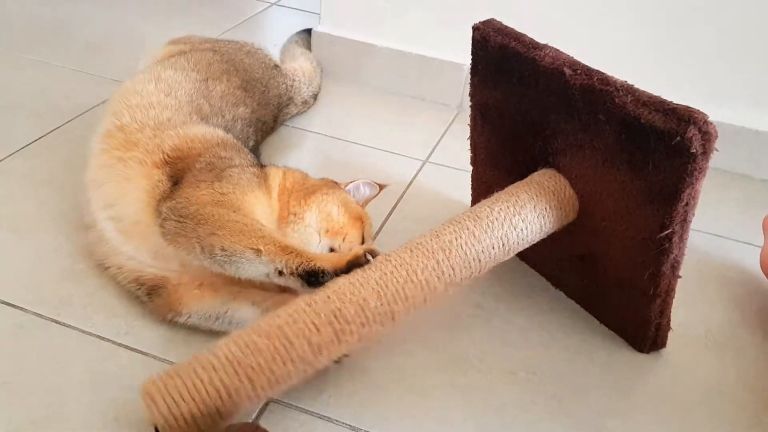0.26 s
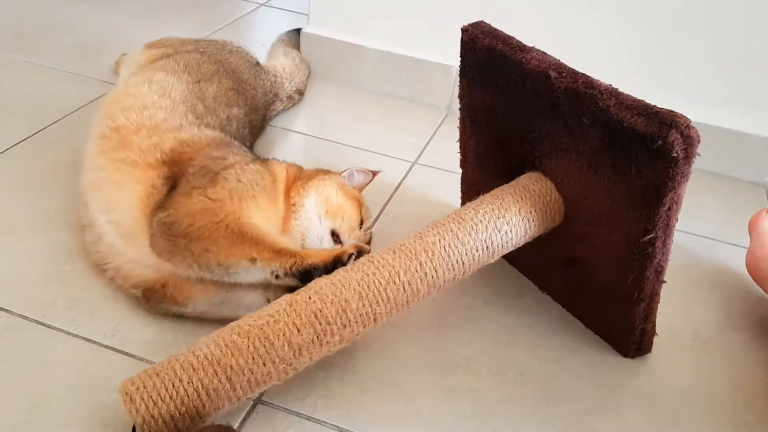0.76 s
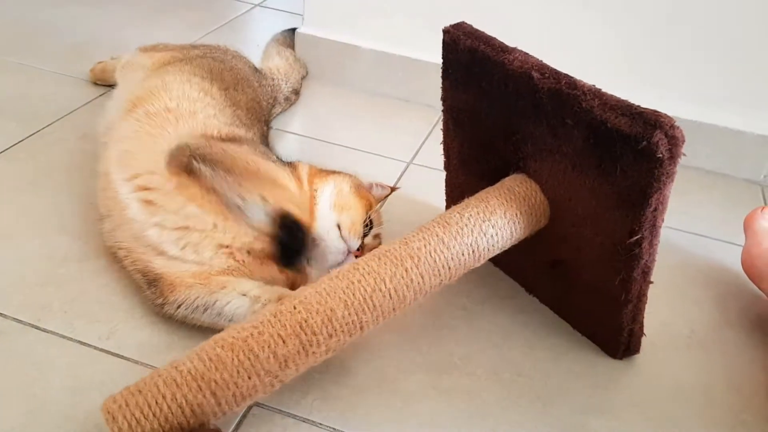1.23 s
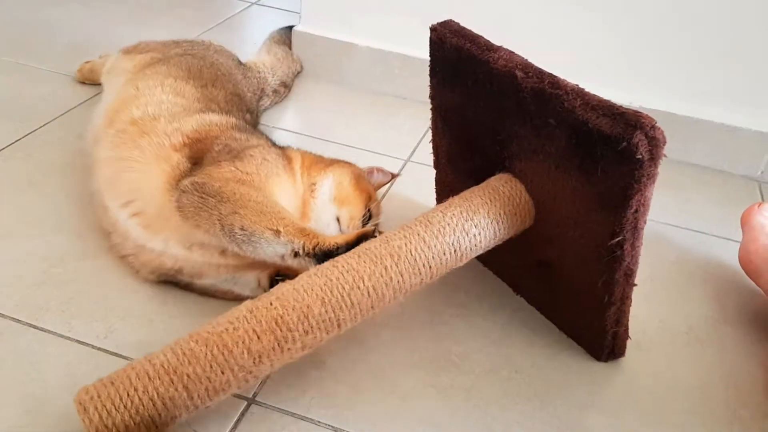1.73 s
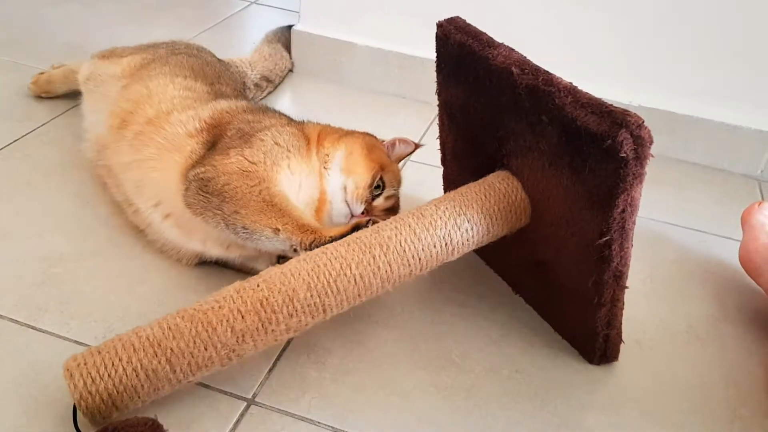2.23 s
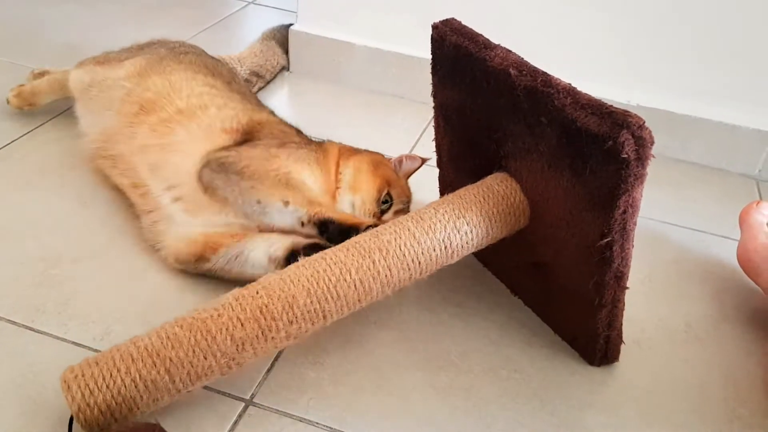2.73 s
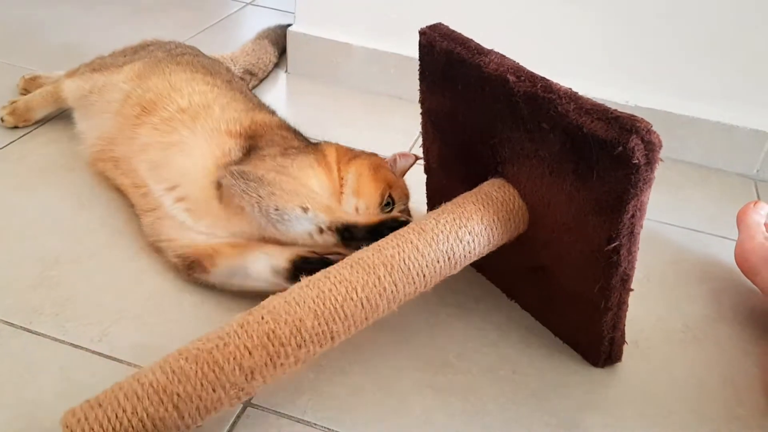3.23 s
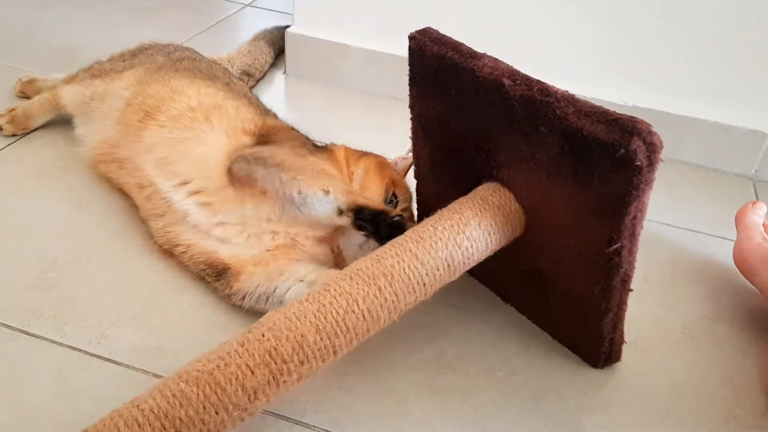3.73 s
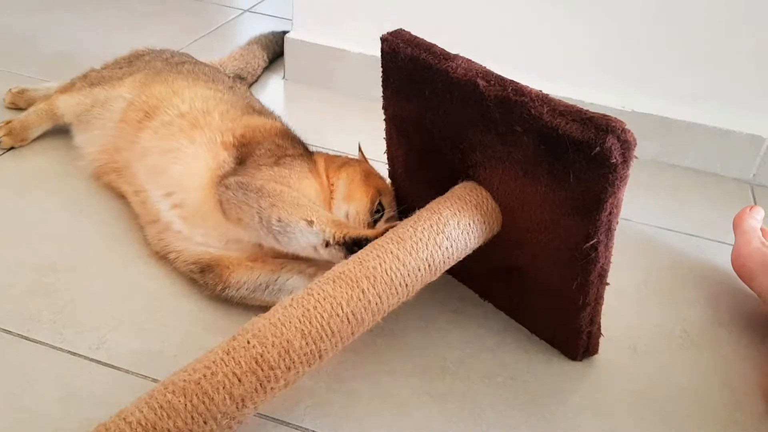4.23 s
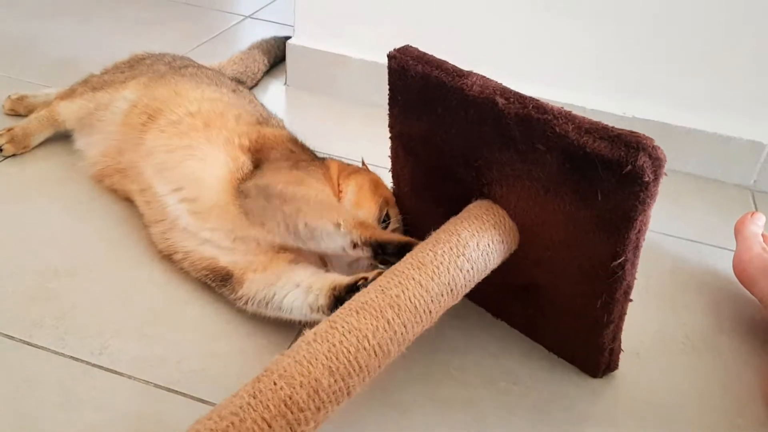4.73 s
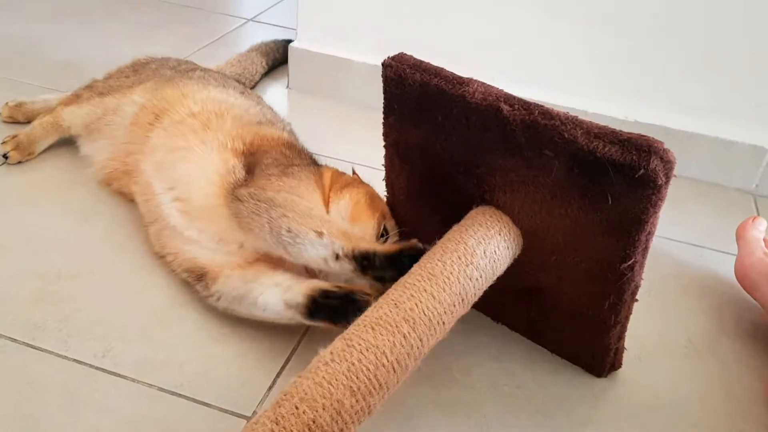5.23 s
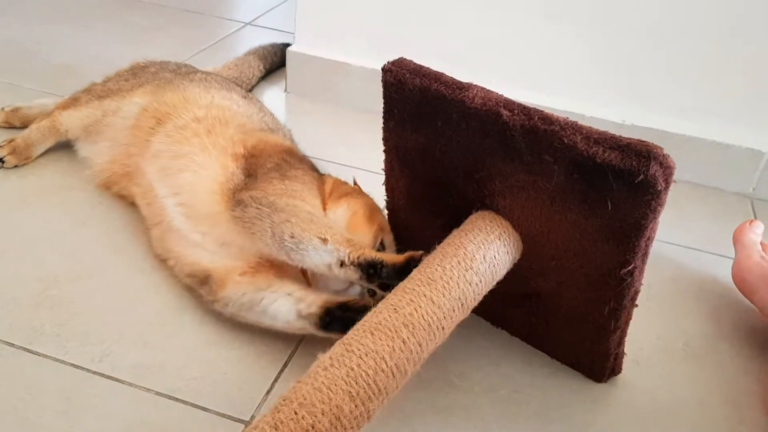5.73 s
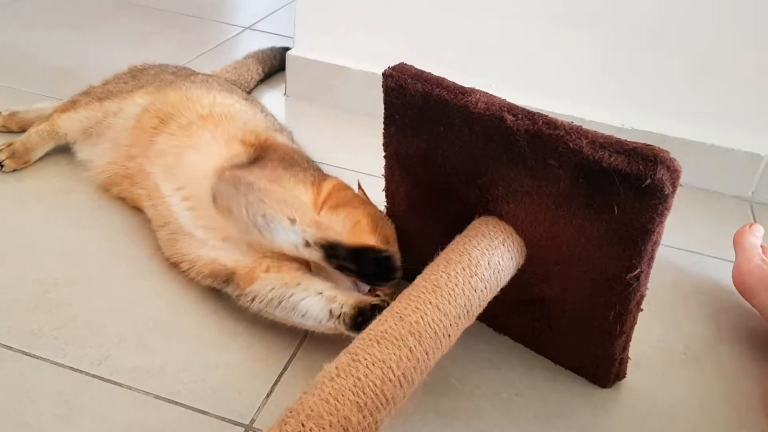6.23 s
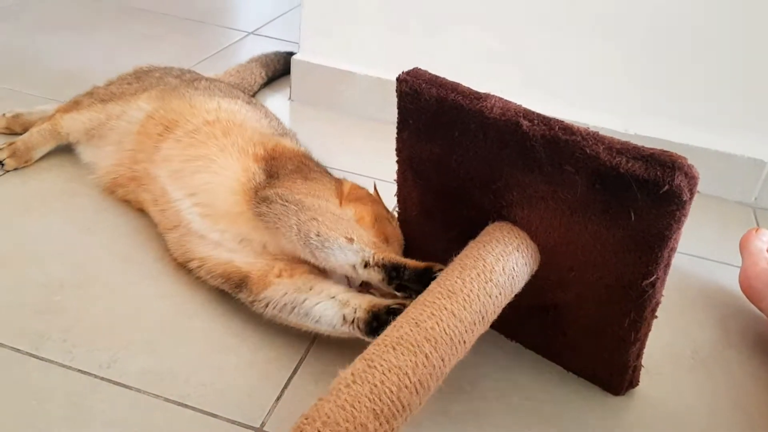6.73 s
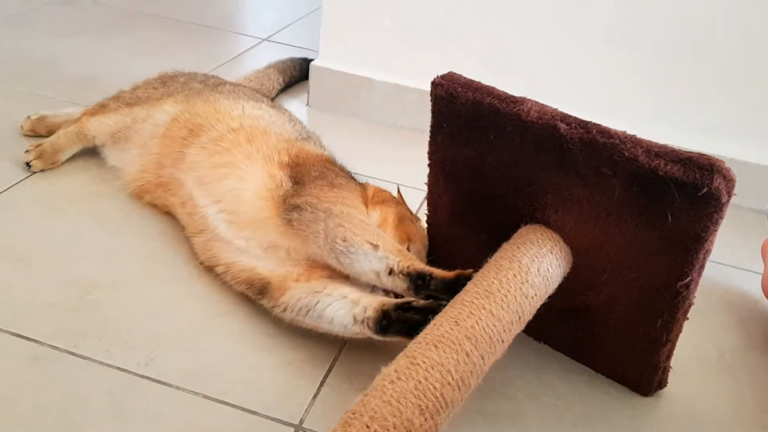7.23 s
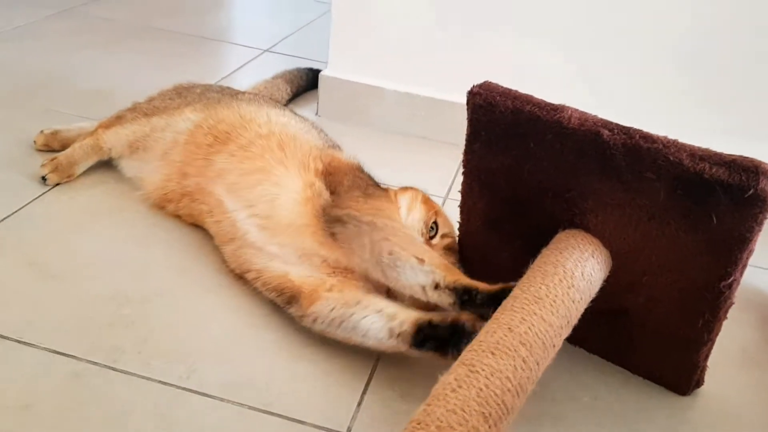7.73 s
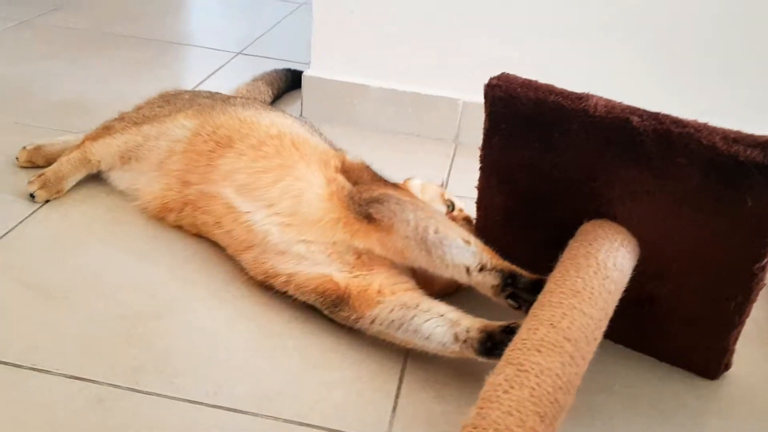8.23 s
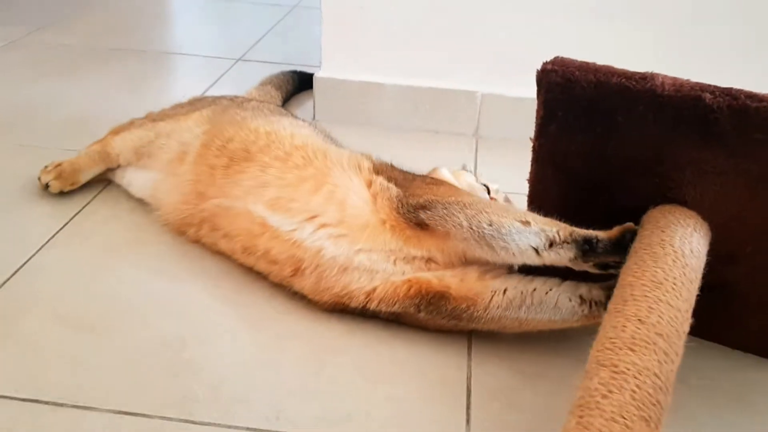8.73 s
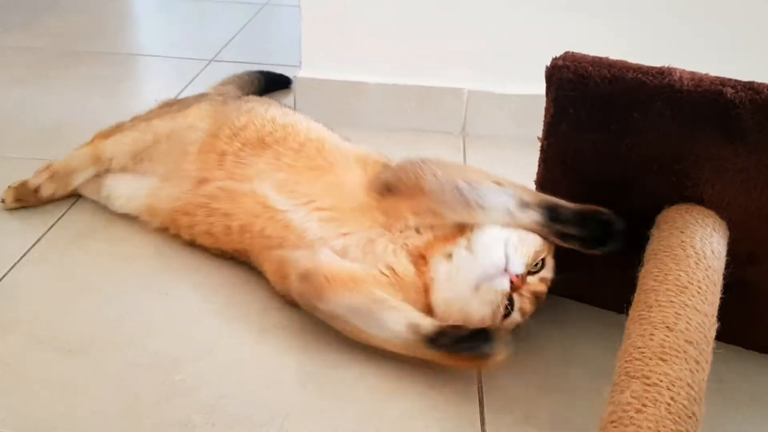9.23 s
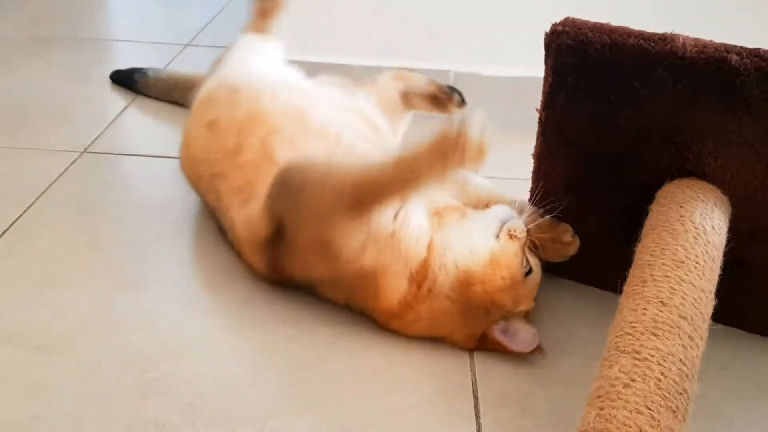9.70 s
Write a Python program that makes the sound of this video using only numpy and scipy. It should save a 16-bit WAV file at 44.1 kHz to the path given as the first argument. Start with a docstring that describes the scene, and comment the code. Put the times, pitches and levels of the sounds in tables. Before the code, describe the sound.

A quiet tiled room holds a steady low drone and thin, flickering hiss throughout. At about 0.4 s a paw faintly brushes coarse rope; at 0.65 a claw snaps free with a sharp, crackling pluck, hollow tube ring and short bright echo. Another strong snap comes at 1.05, a lesser one at 1.3, then light brushing until 2.5. A tight, loud burst hits around 3.0, followed by scattered snaps from 3.6 to 4.3, a hard one at 4.7 and smaller ones to 5.9. Two forceful snaps strike almost together at 6.1. Afterwards the action thins: modest ticks near 7.4, 7.7 and 8.2, faint ones to 9.25, with soft rope rustles. Subtle low tones swell near 4.5 and 6.8. From 7.7 to 9.4 dull, dry bumps nudge one side or the other, and fur slides softly on tile, last around 9.7.

```python
"""Throughout, a bare tiled room lies under a low drone and a flickering hiss, both shaped noise.
First a cat's paws brush a toppled rope scratching post (crackling noise), and claw tips catch lightly.
Then claws snap free: impulses ring strand, cardboard tube and base board, fibres tear and fizz, and the room
echoes; the more a claw pulls, the louder the post rings and the paw brushes near each snap.
Later, sine tones swell from the drone, fur slides over the tiles, and dull one-cycle pushes bump close by."""
import sys
import numpy as np
from scipy import signal
from scipy.fft import rfft, irfft, next_fast_len
from scipy.io import wavfile
from scipy.ndimage import map_coordinates

SR = 44100
rng = np.random.default_rng(int(sys.argv[2]) if len(sys.argv) > 2 else 0)


def transcribe(u):
    """Save the signal u as a 16-bit wav file named by the first command-line argument.

    u: samples, shape (n,) or (channels, n), limited to [-1, 1]; the rate is SR.
    q: integer samples, one column per channel.
    """
    v = np.clip(np.atleast_2d(u).T, -1, 1)
    q = np.round(v * 32767).astype(np.int16)
    wavfile.write(sys.argv[1], SR, q)


N = 439236

# relative spectrum of the low drone: [f/Hz, level/dB]
DRONE_SPECTRUM = [(20, -31), (40, -10), (55, -14), (73, -1), (85, -2.5), (99, 2.5), (122, -6.5),
                  (145, -8.5), (200, -13), (290, -18), (400, -29), (600, -43)]
# relative spectrum of the room's hiss: [f/Hz, level/dB]
HISS_SPECTRUM = [(100, -13), (350, 11), (600, 4), (1100, 7), (2000, 4.5), (3000, -2), (4000, 4),
                 (5600, -3.5), (7400, -11), (10800, -2.5), (13000, -4.5), (16000, -13.5)]
# left-right correlation of diffuse sound: [f/Hz, correlation]
CORRELATION = [(30, 0.64), (80, 0.93), (160, 0.81), (330, 0.59), (800, 0.35), (1500, 0.028), (10000, 0.014)]
# a paw brushes along the rope on its own: [middle t/s, half length/s, level/dB]
BRUSHES = [(0.416, .1, -57), (1.45, .11, -54.5), (1.714, 0.022, -65), (1.9, 0.19, -60.5),
           (2.311, 0.017, -60), (3.384, .12, -63.5), (3.58, 0.068, -58.5), (4.462, .05, -56.5),
           (5.395, 0.14, -66), (6.715, 0.097, -62.5), (7.082, 0.067, -57), (7.19, 0.032, -57),
           (8.128, .04, -58.5), (8.277, 0.064, -66), (8.411, 0.035, -52.5), (8.901, 0.058, -60),
           (9.591, 0.062, -62), (9.936, 0.041, -57.5)]
# relative spectrum of the crackling rope fibres: [f/Hz, level/dB]
FIBRE_SPECTRUM = [(300, -11), (1200, -13.5), (2300, 0.5), (3400, -2.5), (4000, 2.5), (4800, -3.5),
                  (6200, -3), (7600, -11.5), (10900, -7), (13500, -15), (16000, -20)]
# modes of the base board, the cardboard tube and the whole post as it flexes: [f/Hz, width/Hz, level/dB]
BOARD_MODES = [(247.5, 4.6, -20), (289, 19, 3.5), (320, 11.7, -8), (346.8, 8.8, 4), (412, 31, -60)]
TUBE_MODES = [(1020, 140, -5), (1463, 17, -10.5), (1624, 34, -5.5), (1813, 140, 9.5), (1877, 117, 3.5),
              (2132, 60, -8), (2660, 330, -12.5)]
BENDING_MODES = [(750, 450, -31), (789, 31, 9.5), (840, 100, -2)]
# modes of the rope and of its fizzing fibres: [f/Hz, width/Hz, level/dB]
ROPE_MODES = [(3268, 180, -9.5), (3990, 600, -10.5), (4900, 560, -1), (6070, 200, -7)]
FIZZ_MODES = [(9080, 4600, 2), (10780, 1300, -4), (13860, 6300, -1)]
# reverberation time of the tiled room: [f/Hz, T60/s]
ROOM_T60 = [(250, 0.49), (800, 0.57), (2000, 0.3259), (4500, .5), (10000, 0.51), (16000, 1)]
# relative gain of the room's tail: [f/Hz, level/dB]
ROOM_COLOUR = [(200, 8), (400, -1.5), (600, 4), (1100, 6.5), (1800, 4), (2600, 4.5), (3400, 0), (4300, 2),
               (6300, -4.5), (8000, -2), (11000, 0), (15000, -6)]
# a claw snaps free: [t/s, strength level/dB, pull level/dB re strength, fraying level/dB re strength, strand f/Hz]
SNAPS = [(0.6518, -35, -2, -10, 4300), (1.0536, -33.5, -5, -12, 5500), (1.0835, -46.5, 6, -12, 3470),
         (1.2709, -42, -1, -3.5, 4100), (1.3889, -60.5, 6.5, 4, 4000), (2.511, -48, 6.5, -7, 3980),
         (2.9504, -42.5, -11, -3, 4830), (3.0198, -29.5, -9.5, -10.5, 4670), (3.037, -43, -7, -2, 4200),
         (3.0496, -38.5, 0, -1, 3500), (3.561, -48, -30, -8, 4970), (3.6662, -36.5, -17, -9, 4430),
         (3.8642, -39.5, -16.5, -8.5, 4600), (4.0059, -42.5, -5.5, -16, 2850),
         (4.0128, -42, 2.5, -18.5, 3490), (4.3062, -47, 5, 3, 4800), (4.7033, -31.5, -14.5, -15, 4900),
         (4.805, -44, -11, -5, 4300), (4.8158, -38, -22.5, -12, 3480), (5.0289, -43.5, 2, -0.5, 3430),
         (5.1579, -59.5, 8, 8.5, 3970), (5.344, -53.5, -8, -14, 3600), (5.4904, -55.5, -14, -4, 3430),
         (5.5625, -54, -19, -14, 3740), (5.647, -42, -6, -1.5, 4550), (5.9432, -43.5, -20, -12.5, 3200),
         (6.0991, -30.5, -32, -8.5, 4660), (6.1379, -30, -15.5, -13, 3220), (6.3148, -50, 3, 4, 3860),
         (6.586, -59.5, -16, -25, 3250), (6.7949, -66.5, 10, 3, 3700), (6.9739, -47, -18.5, -39, 3190),
         (7.4043, -41.5, -12.5, -4, 3030), (7.5416, -50.5, -14.5, -2, 6500), (7.556, -48.5, -19, -6, 3700),
         (7.6676, -40, -26, -12, 3690), (7.7894, -55, -18.5, -10, 3760), (8.173, -41.5, -16.5, -14, 2870),
         (8.5926, -48.5, -15, -20, 2870), (9.093, -50, -15, -12, 3870), (9.251, -47, -19, -32, 2900)]
# low tones swell out of the drone: [middle t/s, half length/s, level/dB, f/Hz]
TONES = [(3.097, 0.13, -51.5, 77), (4.499, 1, -54.5, 112), (5.622, 0.049, -48.5, 102.4),
         (6.749, 0.63, -51, 69.9), (6.848, 0.22, -55.5, 120.6)]
# fur slides over the tiles: [middle t/s, half length/s, level/dB, f/Hz]
SLIDES = [(2.877, 0.065, -53, 193), (8.046, 0.028, -60, 463), (8.675, 0.047, -61, 480),
          (8.889, .067, -61, 1360), (9.701, .1, -58.5, 414)]
# dull bumps close by: [t/s, level/dB, f/Hz, left-over-right level/dB]
BUMPS = [(7.6893, -29, 244, -23), (7.886, -39.5, 61, -29), (7.9971, -34, 260, 17), (8.0014, -31, 264, 7),
         (8.5938, -33, 714, -21), (8.8005, -40.5, 373, 23), (9.1854, -39.5, 167, -16),
         (9.3656, -37, 526, 31)]

TOP_HZ = 16200  # upper band limit
LEAD_S = 0.008  # the claw starts to slip this long before it lets go
MURMUR_DB = -12  # the tube under a brushing paw, re its crackle
# after a snap the paw brushes on: delay (s), half length (s)
FOLLOW_S, FOLLOW_HALF_S = 0.12, 0.087
# its level (dB) when strength and pull are 0 dB, and its growth with each (dB per dB)
FOLLOW_DB, FOLLOW_PER_STRENGTH, FOLLOW_PER_PULL = -31.5, 0.71, 0.8
# light catches: rate (per s), strength re the stroke (dB), scatter (dB), middle strand pitch (Hz)
CATCHES_PER_S, CATCH_DB, CATCH_SCATTER_DB, CATCH_HZ = 16, -7.5, 4.5, 3900
# the tube lies between strand and board: base level re strength (dB), share of the pull
TUBE_DB, TUBE_PULL = 3, 0.47
STRAND_DB = 3  # rope and plucked strand re strength
BENDING_DB = -14  # the flexing post re the tube's ring
# beyond an easy strength (dB), a snap rings the tube more and tears less, as it breaks clean (dB per dB)
EASY_DB, TUBE_PER_FORCE, TEAR_PER_FORCE = -43, 0.29, -0.6
# tearing fibres: base level re the fizz (dB), build-up time constant (s)
TEAR_DB, TEAR_BUILD_S = 7.5, 0.0035
# the room's answer (dB); it grows with the pull, as the whole post radiates (dB per dB)
ROOM_DB, ROOM_PER_PULL = -6.5, 0.095


def amp(db):
    """An amplitude ratio is ten to the power of level / 20."""
    return 10 ** (np.asarray(db) / 20)


def unit(x):
    """Normalisation: dividing by the root mean square gives rms 1."""
    return x / np.sqrt(np.mean(x ** 2) + 1e-20)


def along(points, hz):
    """Linear interpolation of (f/Hz, value) points over log frequency."""
    f, value = np.transpose(points)
    return np.interp(np.log(hz + 1), np.log(f + 1), value)


def add(track, s, sound):
    """Superposition: a stereo sound adds to the track from time s."""
    start = max(round(s * SR), 0)
    part = track[:, start:start + sound.shape[1]]
    part += sound[:, :part.shape[1]]


def pan(db):
    """Level difference between left and right at a mean power of 1."""
    return unit(amp([[db / 2], [-db / 2]]))


def filtered(x, response):
    """Linear filtering: the spectrum is multiplied by a response of frequency."""
    n = x.shape[-1]
    padded = next_fast_len(n + SR // 10)
    spectrum = rfft(x, padded) * response(np.fft.rfftfreq(padded, 1 / SR))
    return irfft(spectrum, padded)[..., :n]


def resonant(modes, hz):
    """Resonance: the gains of the modes add in power."""
    power = 0
    for centre, width, db in modes:
        detuning = 2 * (hz - centre) / width
        power = power + (amp(db) / width / np.sqrt(1 + detuning ** 2)) ** 2
    return np.sqrt(power)


def swell(half_s):
    """Gaussian envelope: times around a middle and the bell-shaped stroke over them."""
    reach = int(2.5 * half_s * SR)
    t = np.arange(-reach, reach) / SR
    return t, np.exp(-(t / half_s) ** 2)


def wobble(n, rate):
    """Random modulation: a smooth curve through `rate` random knots a second."""
    knots = rng.standard_normal(int(n * rate / SR) + 4)
    return map_coordinates(knots, [np.arange(n) * rate / SR])


def rush(gain, n):
    """Diffuse field: stereo noise of rms 1, alike in the bass and nearly unrelated in the treble."""
    def mid_side(hz):
        angle = np.arccos(np.clip(along(CORRELATION, hz), -1, 1)) / 2
        return gain(hz) * np.array([np.cos(angle), np.sin(angle)])
    mid, side = filtered(rng.standard_normal((2, n)), mid_side)
    return unit(np.array([mid + side, mid - side]))


def hum():
    """Stationary noise: a distant low drone under the room's flickering hiss."""
    drone = amp(-53.0) * rush(lambda hz: amp(along(DRONE_SPECTRUM, hz)), N)
    flicker = amp(-66.0 + 2.9 * wobble(N, rate=4.1))
    hiss = flicker * rush(lambda hz: amp(along(HISS_SPECTRUM, hz)), N)
    return (drone + hiss) * pan(-1.2)


def crackle(n, spread_db):
    """Granular noise: rope fibres give way in dense grains, of log-normal size."""
    grains = rng.standard_normal(n // 20 + 1)
    sizes = amp(spread_db * np.repeat(grains, 20)[:n])  # 20 samples a grain
    return unit(filtered(sizes * rng.standard_normal((2, n)), lambda hz: amp(along(FIBRE_SPECTRUM, hz))))


def hollow(hz):
    """Resonance of the post under a brushing paw: tube and flexing modes, above 600 Hz."""
    modes = resonant(TUBE_MODES, hz) + amp(-13) * resonant(BENDING_MODES, hz)
    return modes / (1 + (hz / 3500) ** 4) * (hz > 600)


def rubbing():
    """Friction: paws brush the rope, alone or after a snap, and the tube murmurs along."""
    out = np.zeros((2, N))
    follow = []
    for s, db, pull_db, _, _ in SNAPS:
        follow_db = FOLLOW_DB + FOLLOW_PER_STRENGTH * db + FOLLOW_PER_PULL * pull_db
        follow.append((s + FOLLOW_S, FOLLOW_HALF_S, follow_db))
    for s, half_s, db in BRUSHES + follow:
        t, stroke = swell(half_s)
        rub = crackle(len(t), spread_db=0.5) + amp(MURMUR_DB) * rush(hollow, len(t))
        pressure = amp(db + 1.9 * wobble(len(t), rate=70))  # the paw rides over the turns of the rope
        add(out, s + t[0], stroke * pressure * rub * pan(-8.5))
    return out


def tear(db):
    """Fracture: a crackle of fibres swells exponentially and stops at the release."""
    t = np.arange(-int(LEAD_S * SR), 0) / SR
    return amp(db) * np.exp(t / TEAR_BUILD_S) * crackle(len(t), spread_db=15.0) * pan(-9.0)


def ring(modes, band_hz, grip_s, slip_s, apart, span_s):
    """Stick-slip excitation of damped modes: noisy slips surround the release impulse at LEAD_S."""
    t = np.arange(SR // 4) / SR
    hz, width, db = np.transpose(modes)[:, :, None]
    strength = amp(db + 2 * rng.standard_normal(hz.shape))
    phase = apart * rng.standard_normal((2, len(modes), 1))  # each mode reaches the two channels differently
    n = min(len(t), int(2 * SR / width.min()))
    decay = strength * np.exp(-np.pi * width * t[:n])
    body = np.zeros((2, len(t)))
    body[:, :n] = (decay * np.sin(2 * np.pi * hz * t[:n] + phase)).sum(1)
    since = t[:SR // 50] - LEAD_S
    before = 0.099 * np.exp(-np.abs(since) / grip_s)
    after = 0.34 * np.exp(-np.abs(since) / slip_s)
    force = np.where(since < 0, before, after) * rng.standard_normal(len(since))
    force[round(LEAD_S * SR)] = 1
    sos = signal.butter(2, np.clip(band_hz, 20, SR / 2 - 100), "bandpass", fs=SR, output="sos")
    sound = signal.sosfilt(sos, signal.fftconvolve(body, force[None], axes=1))
    # the energy up to span_s after the release is scaled to that of rms 1 lasting span_s
    energy = np.sum(sound[:, :int((LEAD_S + span_s) * SR)] ** 2) / 2
    return sound / np.sqrt(energy / (span_s * SR))


def in_room(sound, wet_db, ceiling_db=-16, ceiling_s=0.0098, build_s=0.0032, blur=0.098):
    """Reverberation: the direct sound, one bright ceiling echo and a diffuse decaying tail."""
    source = sound[1:]
    # the room gathers all directions, so it answers with the sound's smoothed spectrum
    energy = np.cumsum(np.abs(rfft(source[0], SR // 2)) ** 2)

    def power(hz, width):
        below = lambda f: np.interp(f, np.fft.rfftfreq(SR // 2, 1 / SR), energy)
        return np.abs(below(hz + width) - below(hz - width)) / width

    def colour(hz):
        reach = 12 + blur * hz * np.minimum(hz / 3000, 1.5)  # the treble blends most
        smoothed = (power(hz, reach) * power(hz, 5 * reach)) ** (1 / 4)
        return smoothed * amp(along(ROOM_COLOUR, hz))

    hz, t, z = signal.stft(rush(colour, SR // 2), SR, nperseg=256)
    fade = amp(-60 * t / along(ROOM_T60, hz)[:, None]) * (1 - np.exp(-(t / build_s) ** 2))
    tail = signal.istft(z * fade, SR, nperseg=256)[1]
    wet = amp(wet_db) * np.linalg.norm(source) * tail / np.linalg.norm(tail[0])
    bright = signal.sosfilt(signal.butter(2, 3000, "highpass", fs=SR, output="sos"), source)
    out = np.zeros((2, SR * 3 // 4))
    add(out, 0, sound)
    add(out, np.argmax(np.abs(source)) / SR, wet)
    # the ceiling echo arrives left first, then stronger on the right
    add(out, ceiling_s, amp(ceiling_db) * bright * [[1], [0]])
    add(out, ceiling_s + 0.0005, amp(ceiling_db + 6.0) * bright * [[0], [1]])
    return out


def pluck(db, pull_db, fray_db, pitch_hz):
    """Coupled vibration: a freed claw plucks the rope, which shakes tube and board as fibres tear and fizz."""
    force_db = np.maximum(db - EASY_DB, 0)
    board = amp(db + pull_db) * ring(
        BOARD_MODES, [200, 700], grip_s=0.0001, slip_s=0.0001, apart=0.2, span_s=0.019)
    tube_db = db + TUBE_DB + TUBE_PULL * pull_db + TUBE_PER_FORCE * force_db
    bending = amp(tube_db + BENDING_DB) * ring(
        BENDING_MODES, [650, 1100], grip_s=0.0001, slip_s=0.0001, apart=0.56, span_s=0.02)
    tube = amp(tube_db) * ring(
        TUBE_MODES, [1200, 2600], grip_s=0.00054, slip_s=0.00024, apart=0.5, span_s=0.0095)
    lightness = np.clip((-db - 39) / 13, 0, 1)  # a light catch sounds little but its own strand
    strand = [(pitch_hz, 600 - 300 * lightness, 5 + 10 * lightness)]
    rope = amp(db + STRAND_DB) * ring(
        ROPE_MODES + strand, [2400, 6000], grip_s=0.00098, slip_s=0.0008, apart=0.58, span_s=0.0055)
    fizz = amp(db + fray_db) * ring(
        FIZZ_MODES, [7800, 16000], grip_s=0.0012, slip_s=0.0016, apart=1.2, span_s=0.0069)
    direct = (board + bending) * pan(-4.6) + tube * pan(-13.5) + rope * pan(-12.0) + fizz * pan(-3.0)
    add(direct, 0, tear(db + fray_db + TEAR_DB + TEAR_PER_FORCE * force_db))
    return in_room(direct, wet_db=ROOM_DB + ROOM_PER_PULL * pull_db)


def catches():
    """Random excitation: claw tips pluck faintly at scattered moments of each lone brush stroke."""
    out = np.zeros((2, N))
    for s, half_s, db in BRUSHES:
        count = int(2 * half_s * CATCHES_PER_S)
        for when, size, pitch in rng.standard_normal((count, 3)):
            tick_db = db + CATCH_DB + CATCH_SCATTER_DB * size
            pitch_hz = CATCH_HZ * np.exp(0.15 * pitch)
            tick = pluck(tick_db, pull_db=-15, fray_db=-14, pitch_hz=pitch_hz)
            add(out, s + half_s * 0.73 * np.tanh(when), tick)
    return out


def snaps():
    """Sudden release: the claws snap out of the rope, each setting the post ringing."""
    out = np.zeros((2, N))
    for s, db, pull_db, fray_db, pitch_hz in SNAPS:
        add(out, s - LEAD_S, pluck(db, pull_db, fray_db, pitch_hz))
    return out


def swelling_tones():
    """Simple harmonic tones: low sines rise and sink in Gaussian swells."""
    out = np.zeros((2, N))
    for s, half_s, db, hz in TONES:
        t, stroke = swell(half_s)
        sine = np.sqrt(2) * np.sin(2 * np.pi * hz * t)  # rms 1
        add(out, s + t[0], amp(db) * stroke * sine[None])
    return out * pan(-1.2)


def slides():
    """Soft friction: fur slides over the tiles as noise in one broad resonance."""
    out = np.zeros((2, N))
    for s, half_s, db, pitch_hz in SLIDES:
        t, stroke = swell(half_s)
        fur = rush(lambda hz: 1 / (1 + ((hz - pitch_hz) / (0.45 * pitch_hz)) ** 2), len(t))
        add(out, s + t[0], amp(db + 1.6 * wobble(len(t), rate=100)) * stroke * fur)
    return out


def bumps():
    """Pressure pulse: soft, dry pushes of about one cycle, mostly in one channel."""
    out = np.zeros((2, N))
    t = np.arange(-SR // 50, SR // 50) / SR
    for s, db, hz, side_db in BUMPS:
        u = np.pi * hz * t
        push = u / (1 + u ** 2) ** 2
        add(out, s + t[0], amp(db) * push / push.max() * pan(side_db))
    return out


def scene():
    """Superposition of the cat at the post and the room around it."""
    return hum() + rubbing() + catches() + snaps() + swelling_tones() + slides() + bumps()


def record(dry):
    """Band limitation: nothing passes from TOP_HZ upwards."""
    return filtered(dry, lambda hz: hz < TOP_HZ)


dry = scene()
out = record(dry)
transcribe(out)
```